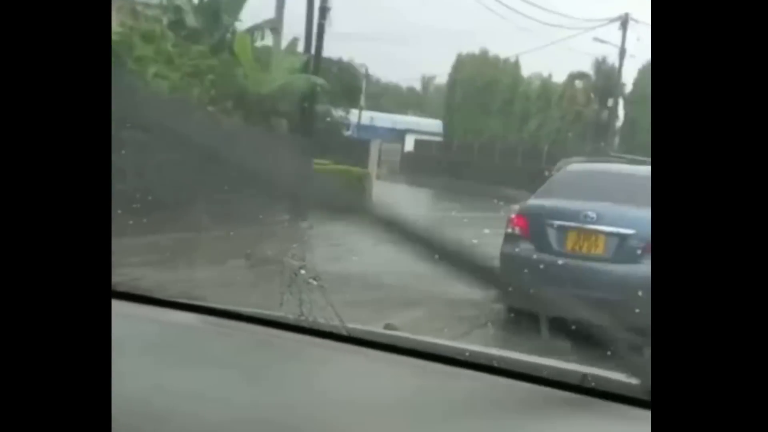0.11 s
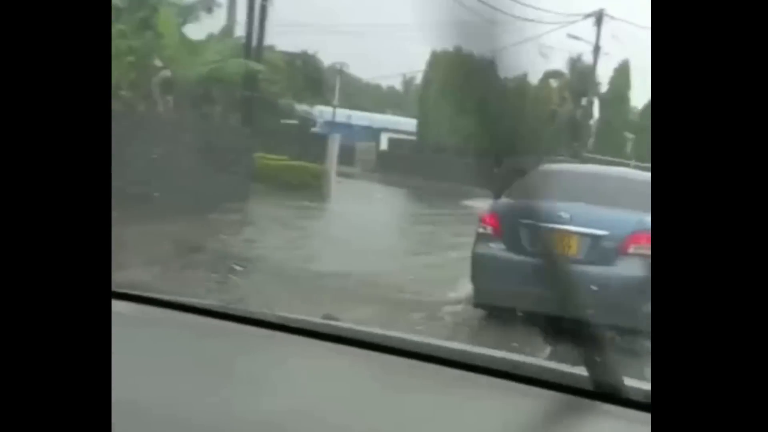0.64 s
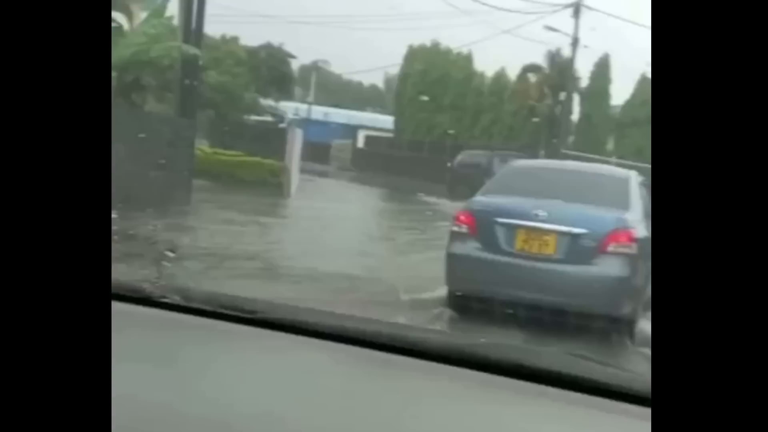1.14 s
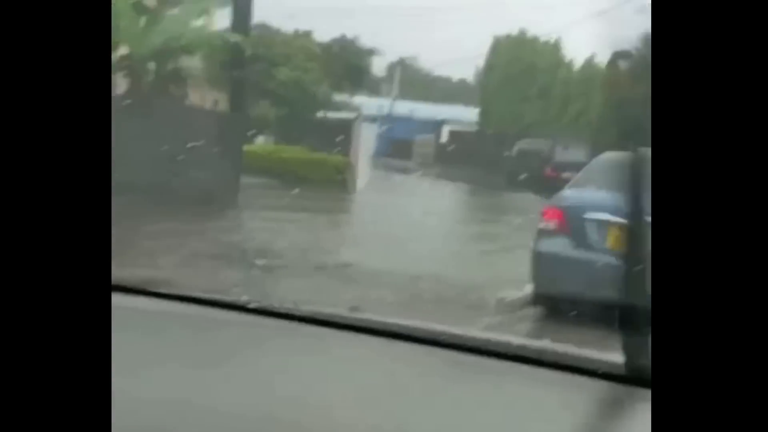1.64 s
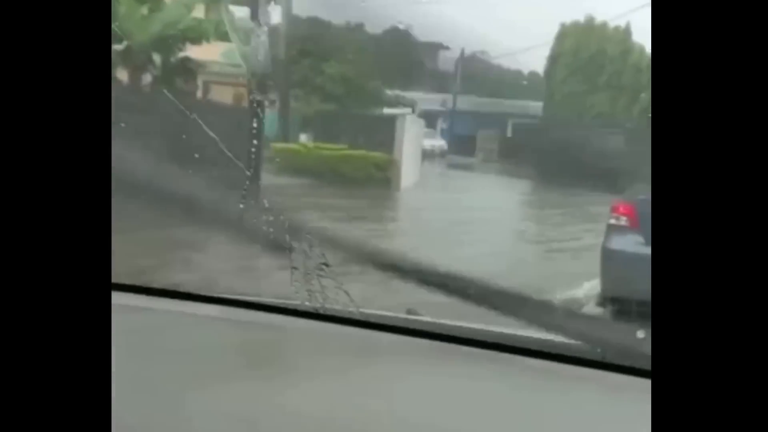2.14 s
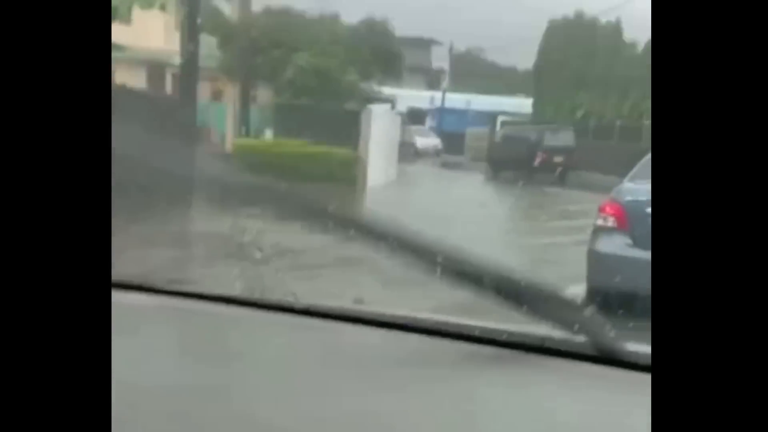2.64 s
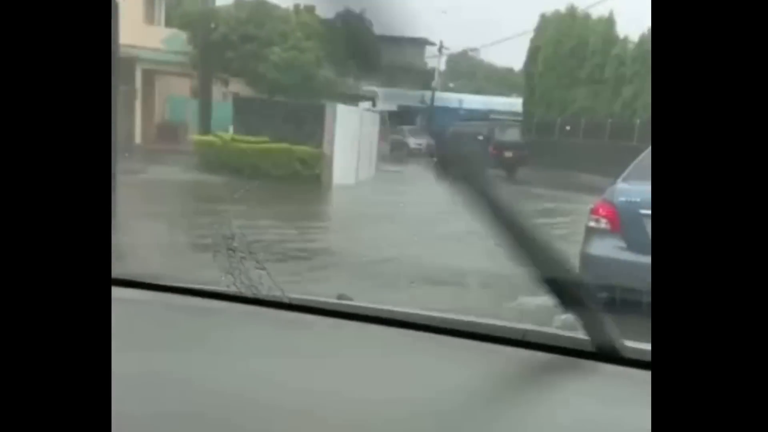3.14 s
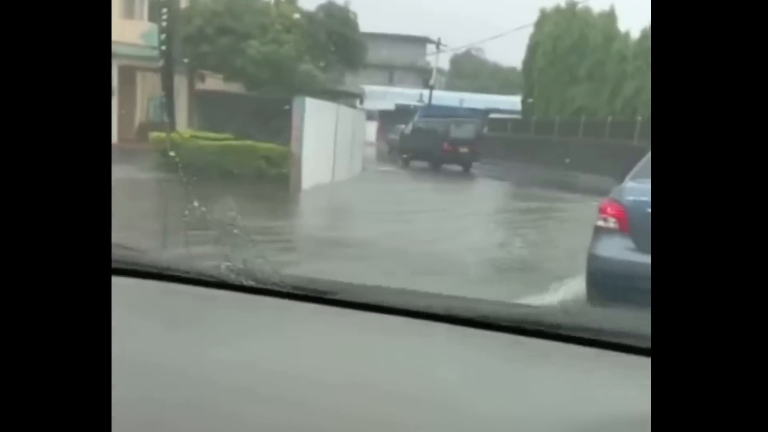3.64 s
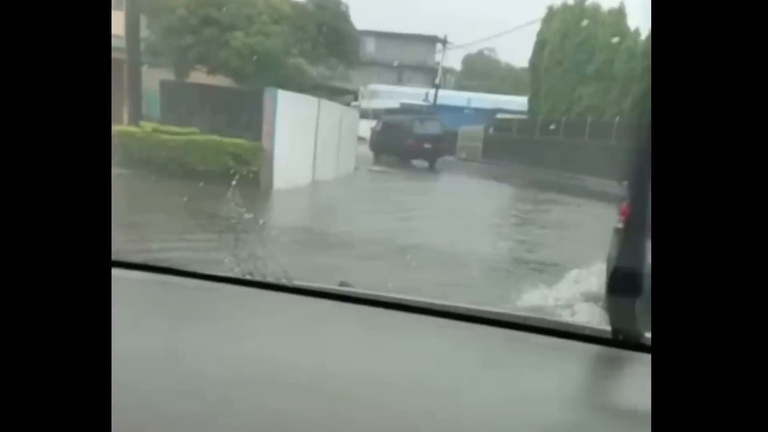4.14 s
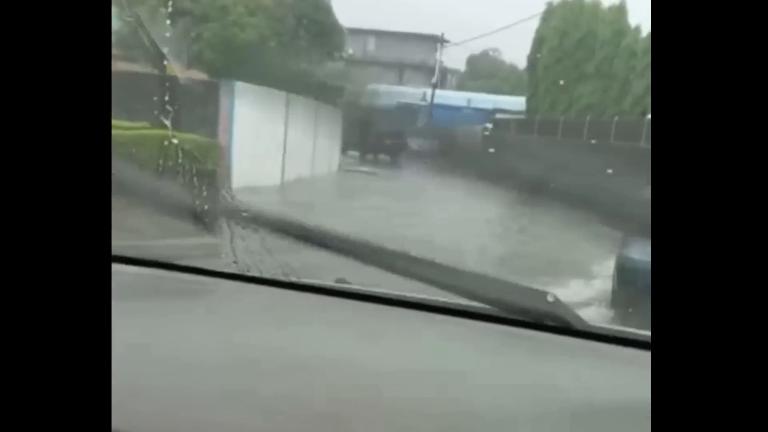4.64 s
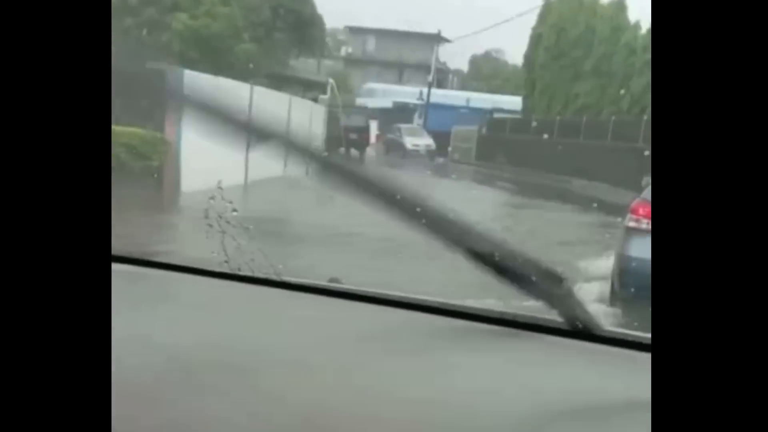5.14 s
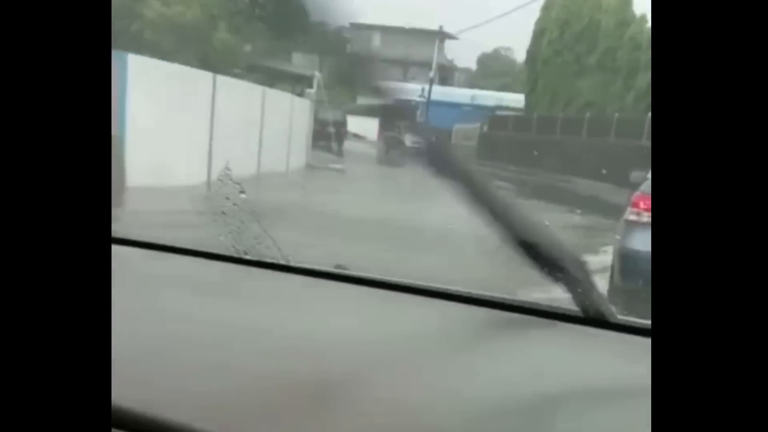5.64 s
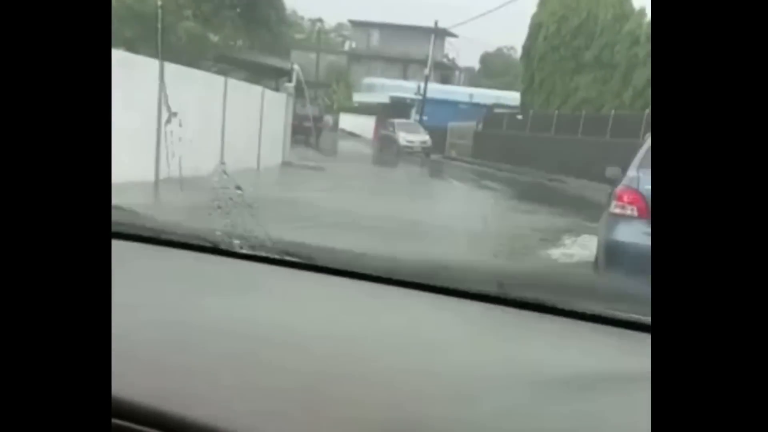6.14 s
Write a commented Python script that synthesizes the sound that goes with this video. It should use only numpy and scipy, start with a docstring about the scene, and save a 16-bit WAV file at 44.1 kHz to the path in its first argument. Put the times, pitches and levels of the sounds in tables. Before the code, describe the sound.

Inside a slowly moving car in heavy rain, a strong steady low hum and boomy road rumble fill the cabin. Dense rain drums on roof and glass, with a softer fine hiss of splashing water around it. Soft, low wiper thuds recur about every 0.84 seconds, each followed half a second later by a fainter one. The microphone is close to the windscreen; rain eases very slightly.

```python
"""A steady drivetrain hum, the harmonic orders of one shaft, booms with road rumble inside a car creeping
along a flooded street in heavy rain, heard by a phone near the windscreen. Road, rain and spray are
noise and random impacts shaped by spectra, resonances and dips; the rain and spray slowly ease.
The wipers thud softly as they turn round: damped modes of the scuttle, struck together."""
import sys
import numpy as np
from scipy import signal
from scipy.fft import rfft, irfft, next_fast_len
from scipy.io import wavfile
from scipy.ndimage import uniform_filter1d

SR = 44100
rng = np.random.default_rng(int(sys.argv[2]) if len(sys.argv) > 2 else 0)


def store_pcm(level_fs):
    """Save levels as 16-bit WAV."""
    pcm = np.round(np.clip(level_fs, -1, 1) * 32767).astype(np.int16)
    wavfile.write(sys.argv[1], SR, np.atleast_2d(pcm).T)


def to_linear_factor(level_db):
    """Convert decibel levels (scalar or array-like) to linear amplitude factors."""
    exponent = np.asarray(level_db, float) / 20
    return 10 ** exponent


N = 276486

# cabin resonances and dead spots at the phone, except the last row, a narrow treble dip
# in the middle of the stereo image: f/Hz, width/Hz, level/dB
MID_BUMPS = [(790, 60, -7), (877, 70, 5), (990, 60, 2), (1400, 80, -3), (1550, 100, 2), (1700, 80, 2),
             (2060, 80, 2), (2750, 120, -4), (2860, 90, 2), (3950, 120, -3), (7780, 280, -9)]
# resonances across the cabin, opposite in sign at the two ports, except the last row,
# a narrow treble dip in the side part: f/Hz, width/Hz, level/dB
SIDE_BUMPS = [(300, 80, 5), (370, 30, -6), (457, 100, 10), (610, 60, -5), (715, 50, 3), (760, 40, -5),
              (960, 110, 4), (1055, 40, -3), (1250, 50, -3), (1315, 60, 3), (1510, 70, 3), (1700, 70, 2),
              (2720, 100, -5), (8120, 120, -6)]


def colour(x, points, bumps=()):
    """Minimum-phase filtering: a causal response whose log magnitude follows the points plus bell bumps."""
    size = next_fast_len(x.shape[-1] + SR // 2, True)
    hz = np.arange(size // 2 + 1) * SR / size + 1  # offset keeps the logarithm finite
    point_hz, point_db = np.transpose(points)[:2]
    db = np.interp(np.log(hz), np.log(point_hz), point_db)
    for centre_hz, width_hz, top_db in bumps:
        db = db + top_db * np.exp(-.5 * (2 * (hz - centre_hz) / width_hz) ** 2)
    # folding the cepstrum onto positive time gives the minimum phase
    cepstrum = irfft(db * np.log(10) / 20, size)
    cepstrum[1:size // 2] *= 2
    cepstrum[size // 2 + 1:] = 0
    response = np.exp(rfft(cepstrum))
    return irfft(rfft(x, size) * response, size)[..., :x.shape[-1]]


def level(x, db):
    """Gain: normalise x to unit rms, then apply a fixed or time-varying level in dB."""
    return x * to_linear_factor(db) / np.sqrt(np.mean(x ** 2))


def walk(rate):
    """Slow random modulation: levels held 1 / rate s and averaged twice; spread near 1."""
    k = int(SR / rate)
    held = np.repeat(rng.standard_normal(N // k + 1), k)
    return 1.6 * uniform_filter1d(uniform_filter1d(held, k), k)[:N]


def ports(x):
    """Arrival-time difference: sound from one side reaches the left port a little before the right."""
    lag_s = 0.00012
    turn = np.exp(1j * np.pi * np.arange(N // 2 + 1) * SR / N * lag_s)  # half the lag each way
    return irfft(rfft(x) * np.array([turn, turn.conj()]), N)


def hum():
    """Harmonic series of a rotating shaft at a nearly even speed; the higher orders waver more."""
    # shaft orders: order, level/dB rms
    shaft_orders = [(1, -39.5), (2, -26), (3, -46), (4, -50), (5, -56)]
    shaft_hz, drift_hz = 54.93, .06
    phase = 2 * np.pi * np.cumsum(shaft_hz + drift_hz * walk(1.5)) / SR
    total = np.zeros(N)
    for order, db in shaft_orders:
        gain = np.sqrt(2) * to_linear_factor(db + .5 * order * walk(3))
        total += gain * np.cos(order * phase + 2 * np.pi * rng.random())
    return total


def road(db):
    """Forced vibration: tyres wading through water shake the floor, and the cabin booms."""
    # relative spectrum of the rumble: f/Hz, level/dB
    rumble_spectrum = [(25, -37.5), (42, -34), (50, -12.5), (60, -11), (72, -8.5), (90, -0.5), (110, -2),
                       (130, 0.5), (158, -11.5), (175, -13), (200, -9.5), (225, -13.5), (260, -15),
                       (400, -58.5)]
    return level(colour(rng.standard_normal(N), rumble_spectrum), db)


def drops(rate, spread_db, wash_db):
    """Shot noise: random impacts (rate per s) of uneven size over a wash of countless small ones; rms 1."""
    hit = rng.random(N) < rate / SR
    size_db = np.minimum(spread_db * rng.exponential(size=N), 18)
    wash = rng.standard_normal(N)
    impacts = level(hit * to_linear_factor(size_db), 0)
    return level(impacts + to_linear_factor(wash_db) * wash, 0)


def rain(db):
    """Impact excitation of resonances: drops drum on roof and glass, part along the cabin, part across."""
    # relative spectrum of the part along the cabin: f/Hz, level/dB
    along_spectrum = [(120, -23.5), (230, -6.5), (330, -1), (420, -3.5), (550, -4), (700, -8), (1000, -13),
                      (1400, -15), (2500, -52)]
    # relative spectrum of the part across the cabin: f/Hz, level/dB
    across_spectrum = [(120, -34), (230, -15.5), (400, -12), (600, -19.5), (850, -17.5), (1100, -12.5),
                       (1500, -38), (2500, -57)]
    gust = to_linear_factor(.4 * walk(6))
    along = colour(gust * drops(1500, spread_db=3.5, wash_db=1.0), along_spectrum, MID_BUMPS)
    across = colour(gust * drops(1500, spread_db=3, wash_db=8.0), across_spectrum, SIDE_BUMPS)
    # the left port sits nearer the loop of the crosswise resonances
    return level(ports(along) + across * np.array([[1.15], [-.85]]), db)


def flicker(x, depth_db, from_hz):
    """Time-frequency modulation: the treble flickers as narrow patches of it sink for a moment."""
    hz, _, z = signal.stft(x, SR, nperseg=2048)
    coarse = rng.exponential(size=(len(hz) // 3 + 1, z.shape[1] // 3 + 1))
    patch = np.kron(coarse, np.ones((3, 3)))[:len(hz), :z.shape[1]]
    # the share of the depth varies with frequency; each patch scales it by a random square
    share = np.interp(hz, [from_hz, 2 * from_hz, 7000, 10000], [0.075, 0.68, 1, 0.52])
    sink_db = depth_db * share[:, None] * patch ** 2
    return signal.istft(z * to_linear_factor(-sink_db), SR, nperseg=2048)[1][:N]


def spray(db):
    """Diffuse field: patter and hiss of splashing drops from all round, as unrelated mid and side parts."""
    # relative spectrum of the hiss: f/Hz, level/dB
    hiss_spectrum = [(500, -17), (900, -18), (1300, -7), (1600, -3), (2100, -6), (2600, -9.5),
                     (3200, -11.5), (4000, -12), (5000, -16.5), (6500, -20.5), (8000, -23), (9700, -31),
                     (10600, -26.5), (12400, -24.5), (14000, -29), (15700, -55)]
    gust = to_linear_factor(.3 * walk(8))
    parts = []
    for bumps in (MID_BUMPS, SIDE_BUMPS):
        patter = gust * drops(4000, spread_db=5.0, wash_db=8.5)
        parts.append(flicker(colour(patter, hiss_spectrum, bumps), depth_db=6, from_hz=1830))
    mid, side = parts
    return level(mid + side * np.array([[1], [-1]]), db)


def wipers():
    """Modal synthesis: at each turn the linkage takes up the load in one soft blow that rings the scuttle."""
    # wiper turns at the foot of the glass: t/s, peak level/dB
    foot_turns = [(.0485, -10), (.8876, -11), (1.7246, -11.5), (2.5613, -12.5), (3.4061, -11),
                  (4.2463, -10.5), (5.0876, -11), (5.927, -10)]
    # modes of the scuttle: f/Hz, relative level/dB, t60/s
    scuttle_modes = [(114, 0, .4), (145, 0, .4), (178, -7, .3), (205, -1.5, .4), (225, -7, .35),
                     (250, -15, .15), (330, -18, .12), (450, -18, .12), (700, -19, .15), (870, -16, .2),
                     (1005, -12, .2), (1480, -23, .15)]
    crest_s, load_s = .012, .007
    far_turn_s, far_turn_db = .5, -8  # the turn at the other end of the sweep, after each thud
    t = np.arange(SR // 3) / SR
    ringing = np.zeros(len(t))
    for hz, db, t60 in scuttle_modes:
        # all modes swing out together at the crest
        ringing += to_linear_factor(db) * np.cos(2 * np.pi * hz * (t - crest_s)) * np.exp(-np.log(1000) * t / t60)
    load = 1 - np.exp(-(t / load_s) ** 2)  # builds smoothly
    thud = load * ringing
    blows = np.zeros(N)
    for s, db in foot_turns:
        blows[int(s * SR)] = -to_linear_factor(db)
        blows[min(int((s + far_turn_s) * SR), N - 1)] = to_linear_factor(db + far_turn_db)
    return signal.fftconvolve(blows, thud / np.abs(thud).max())[:N]


def scene():
    """Superposition: hum, rumble and wipers come through the body; easing rain and spray surround the phone."""
    ease_db = -0.13 * np.arange(N) / SR  # dB per s times time
    body = ports(hum() + road(-25.5) + wipers())
    mix = body + rain(-30.5 + ease_db) + spray(-39.5 + ease_db)
    left_over_right_db = 0.76
    return mix * to_linear_factor(np.array([[left_over_right_db], [-left_over_right_db]]) / 2)


def band_limit(x):
    """A steep low-pass at the top of the band."""
    return signal.sosfilt(signal.butter(12, 15830, fs=SR, output="sos"), x)


def record(dry):
    """Band limiting: the deepest bass and the very top are cut, and the treble has a narrow dip."""
    # narrow dip in the treble: f/Hz, width/Hz, level/dB
    treble_dip = [(10100, 250, -7)]
    top_hz = 15740
    band_edges = [(5, -40), (20, 0), (top_hz - 20, 0), (top_hz, -60)]  # f/Hz, level/dB
    return band_limit(colour(dry, band_edges, treble_dip))


dry = scene()
out = record(dry)
store_pcm(out)
```